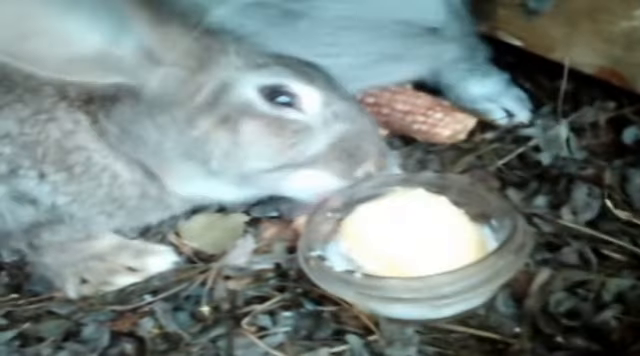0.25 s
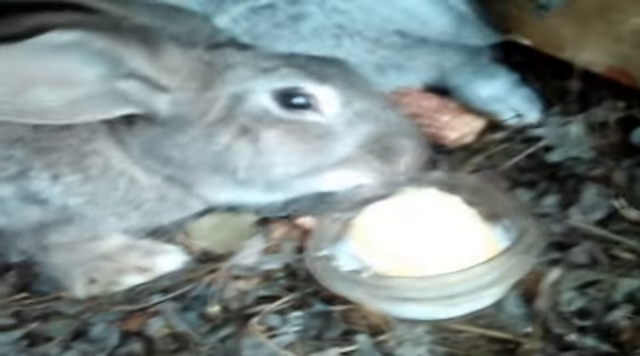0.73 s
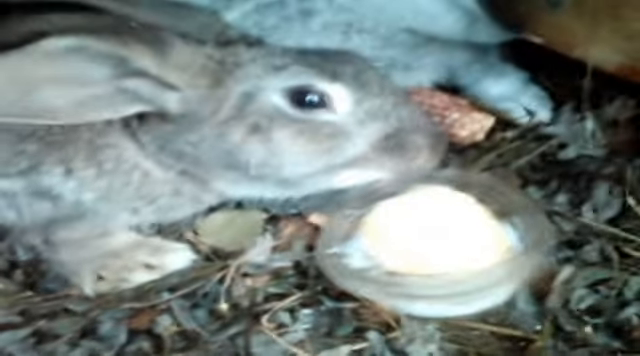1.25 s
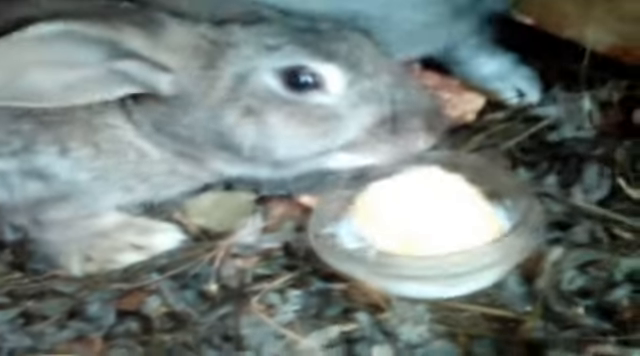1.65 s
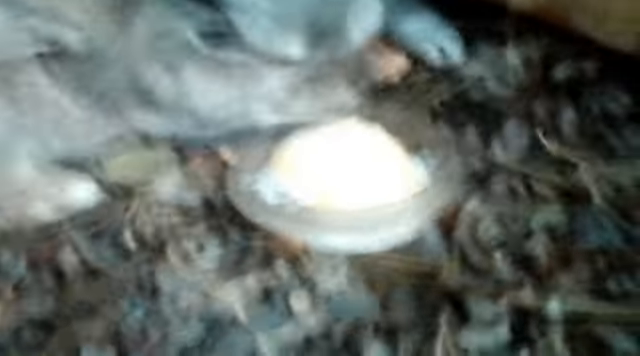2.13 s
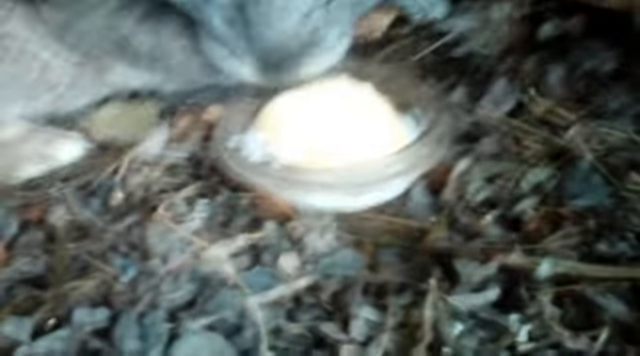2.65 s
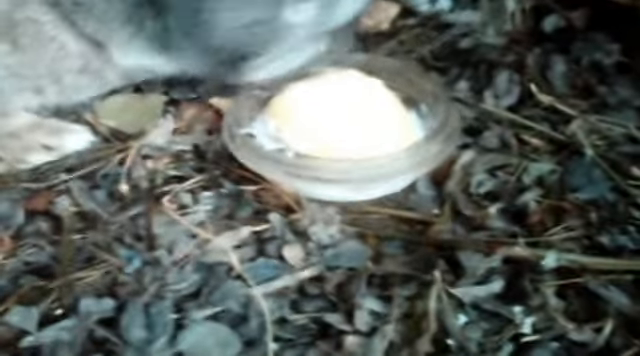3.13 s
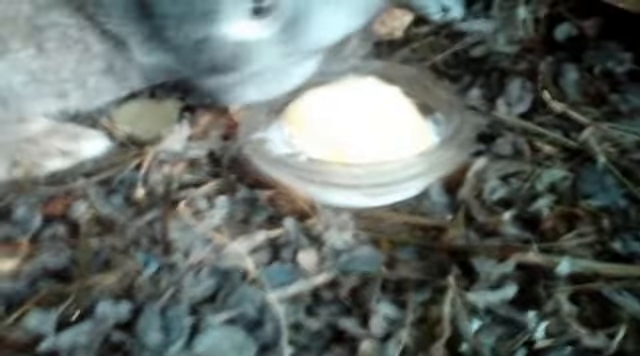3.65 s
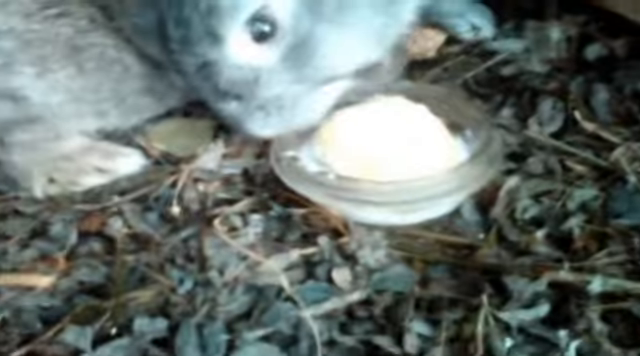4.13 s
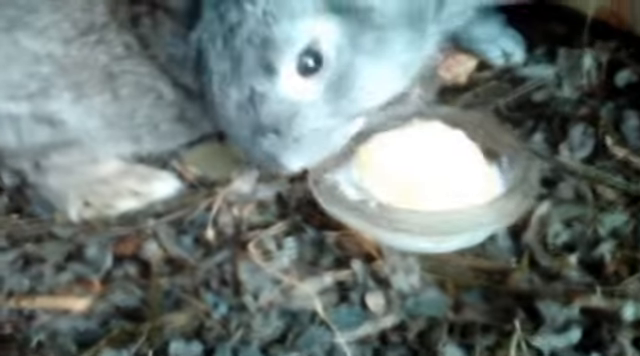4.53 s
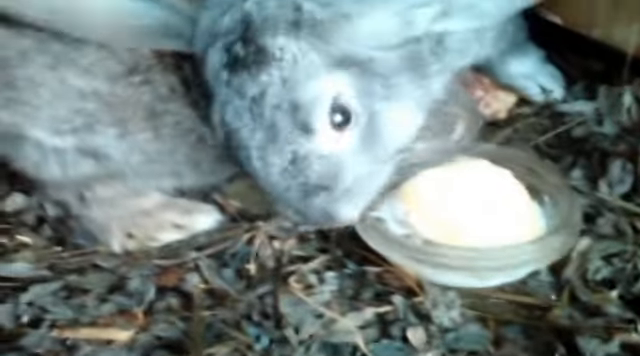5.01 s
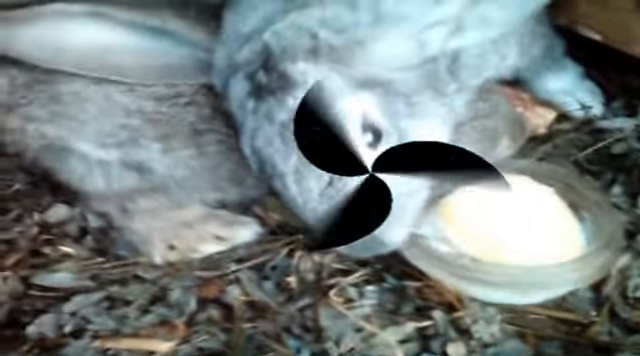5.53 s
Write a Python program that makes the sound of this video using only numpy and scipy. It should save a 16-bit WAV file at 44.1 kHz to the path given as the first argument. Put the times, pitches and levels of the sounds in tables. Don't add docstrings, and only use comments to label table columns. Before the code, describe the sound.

Very close to a small camera microphone outdoors on dry litter, a rabbit nibbles faintly at a hard block in a glass dish, then bites harder with sharp cracks. A second rabbit takes over with denser crunching, loudest just after three seconds with a dull dish knock. Later only sparse nibbles, ticks and soft paw thuds remain over low hiss.

```python
import sys
import numpy as np
from scipy import signal
from scipy.fft import rfft, irfft, next_fast_len
from scipy.io import wavfile
from scipy.ndimage import uniform_filter1d, map_coordinates

SR = 44100
rng = np.random.default_rng(int(sys.argv[2]) if len(sys.argv) > 2 else 0)


def gain_from_db(level_db):
    decades = np.asarray(level_db, float) / 20
    return 10 ** decades


def file_out(sig):
    cols = np.atleast_2d(sig).T
    lim = np.clip(cols, -1, 1)
    pcm = np.round(lim * 32767).astype(np.int16)
    wavfile.write(sys.argv[1], SR, pcm)


N = 254456
CLOCK = np.arange(N) / SR


def unit(x):
    return x / np.sqrt(np.mean(x ** 2) + 1e-20)


def curves(rows):
    s, *columns = np.transpose(rows)
    return [np.interp(CLOCK, s, column) for column in columns]


def wobble(rate_hz):
    knots = rng.standard_normal(int(N * rate_hz / SR) + 4)
    return map_coordinates(knots, [CLOCK * rate_hz])


def filtered(x, response):
    m = next_fast_len(N + 8192)
    return irfft(rfft(x, m) * response(np.fft.rfftfreq(m, 1 / SR)), m)[:N]


# centre_hz [Hz], width_hz [Hz], level_db [dB]
JAW_MODES = [(920, 130, -1), (1200, 240, -5), (1480, 220, -6), (1690, 150, 1), (2050, 200, -5)]
DISH_MODES = [(2563, 690, 2), (2900, 620, 0.5), (3820, 530, -1), (4400, 3400, -2)]
BLOCK_MODES = [(5690, 1640, 1.2), (6730, 1100, 0.52), (7440, 1200, 1.3), (8360, 1900, -0.42)]
EDGE_MODES = [(9500, 1000, -3.5), (11010, 1000, 0), (12050, 1100, -0.5), (14700, 1600, -5.5)]
SOIL_MODES = [(130, 270, -10.5), (267, 280, 6.5), (610, 330, 1.5)]
# centre_hz [Hz], width_hz [Hz], level_db [dB at firmness 1]
HOUSING_DIPS = [(2300, 100, -1.5), (4750, 200, -1.2), (10100, 300, -0.7), (13300, 500, -2.5), (15700, 300, -3)]
# start_s [s], lean_db [dB, dish over jaw], dish_hz [Hz], block_hz [Hz], firmness [1]
POSE = [(.1, 0.5, 3030, 6600, 1.9), (.24, 11, 4100, 7400, 1.3), (.3, 20, 2980, 6200, 0.74),
        (.53, 9, 2960, 7200, 0.63), (.8, 0, 3840, 7050, 0.34), (1.3, -4.5, 3650, 6460, 0.75),
        (1.5, 2, 3400, 7000, 1.36), (1.7, 4, 3300, 7100, 0.96), (1.83, 9, 3900, 7000, 0.48),
        (1.95, 3, 3600, 6100, 0.96), (2.24, 0, 3650, 6570, 0.75), (2.4, -0.5, 3250, 6640, 1.3),
        (2.8, -1.5, 4020, 7000, 1.27), (2.95, -6, 3500, 7000, 1.17), (3.1, 1.5, 3200, 6970, 1.7),
        (3.55, -2.5, 4100, 7060, 1.16), (4.2, -6.5, 3670, 7000, 1.1), (5.7, -2.5, 3700, 8500, 0.78)]
# start_s [s, centre], half_length_s [s], level_db [dB added to the soil]
SHOVES = [(.04, .03, 16), (0.373, 0.11, 22.5), (0.816, 0.066, 23), (1.302, .04, 14.5), (1.65, 0.035, 14),
          (2.355, 0.15, 24), (2.538, .04, 13.5), (3.013, .02, 19), (3.132, .025, 19.5), (3.303, 0.077, 5.5),
          (3.704, 0.03, 7), (4.1, .1, 14), (4.86, .05, 25)]
# jaw_hz [Hz], jaw_width [log ratio], jaw_lead_db [dB], edge_hz [Hz],
# edge_lead_db [dB], dip_depth [1], edge_share_db [dB]
SKULLS = [
    (1360, 0.17, 1, 11600, 1.6, 0.8, -1),
    (1700, .07, 3, 10200, 5.4, 0.85, 0.53),
]
SWAP_S = 2.62


def gnawing():
    hz, t, z = signal.stft(grit(spread_db=2.1, clump_db=0.9), SR, nperseg=512, noverlap=384)
    hz = hz[:, None] + 1
    at = np.minimum(np.round(t * SR).astype(int), N - 1)
    force, depth_db = pressure()
    depth_db = depth_db[at]
    skull = np.array(SKULLS)[(t > SWAP_S).astype(int)].T
    jaw_hz, jaw_width, jaw_lead_db, edge_hz, edge_lead_db, dip_depth, edge_share_db = skull
    lean_db, dish_hz, block_hz, firmness = [curve[at] for curve in curves(POSE)]

    jaw_db = depth_db - lean_db / 2
    dish_db = depth_db + lean_db / 2
    edge_db = -7.5 + 6 * (block_hz / 1000 - 7) - 0.19 * depth_db + edge_share_db
    edge_hz = edge_hz + 4600 * (firmness - 1.3)
    soil_db = -23.5 + sum(db * np.exp(-((t - s) / half) ** 2) for s, half, db in SHOVES)

    rasp = gain_from_db(2 * jaw_db) * body(JAW_MODES, hz, firmness, jaw_hz, jaw_width, jaw_lead_db)
    rasp += gain_from_db(2 * dish_db) * body(DISH_MODES, hz, firmness, dish_hz, width=0.18, lead_db=6.5)
    rasp += body(BLOCK_MODES, hz, firmness, block_hz, width=0.19, lead_db=4.5)
    rasp += gain_from_db(2 * edge_db) * body(EDGE_MODES, hz, firmness, edge_hz, width=0.099, lead_db=edge_lead_db)
    housing_db = sum(db * np.exp(-((hz - centre) / w) ** 2 / 2) for centre, w, db in HOUSING_DIPS)
    rasp *= gain_from_db(2 * firmness * dip_depth * housing_db)
    scrape = gain_from_db(2 * soil_db) * body(SOIL_MODES, hz, 1.01, lead_hz=300, width=0.56, lead_db=-8.5)

    patches = uniform_filter1d(rng.standard_normal(z.shape), size=9, axis=0)
    patches = uniform_filter1d(patches, size=7, axis=1)
    gain = np.sqrt((rasp + scrape) / np.sum(rasp, axis=0) * len(hz))
    gain = gain * gain_from_db(1.54 * unit(patches))
    grains = signal.istft(z * gain, SR, nperseg=512, noverlap=384)[1][:N]
    chatter_db = 0.7 * wobble(70)
    return force * gain_from_db(-0.73 + chatter_db) * grains


def grit(spread_db, clump_db):
    size_db = spread_db * np.minimum(rng.exponential(size=N), 4)
    size_db = size_db + clump_db * wobble(260)
    return unit(rng.standard_normal(N) * gain_from_db(size_db))


def body(modes, hz, firmness, lead_hz, width, lead_db):
    peaks = 0
    for centre, w, db in modes:
        peaks = peaks + gain_from_db(2 * db) * (hz * w) ** 2 / ((centre ** 2 - hz ** 2) ** 2 + (hz * w) ** 2)
    nearness = np.exp(-(np.log(hz / lead_hz) / width) ** 2 / 2)
    power = peaks ** np.clip(firmness, 0.5, 3) * gain_from_db(2 * lead_db * nearness)
    return power / np.sum(power, axis=0)


# [dB, jaw and dish against block]
NIBBLES = [(.038, .008, .005, -64, 1), (.076, .006, .012, -60.5, -8), (.116, .008, .006, -54, -8),
           (.234, 0.02, .005, -52, -14), (.285, .013, 0.025, -58.5, -4), (.326, .013, .006, -57, -13),
           (.36, .05, 0.064, -67.5, -11), (.425, .006, .011, -58, -20), (.505, .008, 0.011, -59, -5.5),
           (.551, .013, .015, -61.5, -5), (.894, .016, .012, -61.5, -6), (2.013, .005, .05, -61, 1),
           (2.08, .012, 0.034, -59, 4), (3.8, .015, .012, -59, 10), (3.838, 0.044, 0.018, -55, 1),
           (3.963, 0.014, 0.011, -53, -3.5), (4.014, .01, .006, -53, -2.5), (4.033, .011, 0.022, -61.5, 4),
           (4.113, 0.024, 0.03, -56.5, -2.5), (4.855, .007, 0.034, -67, 8), (5.356, .005, .001, -56.5, -9),
           (5.699, .005, 0.021, -51.5, -3), (5.726, 0.028, 0.017, -52.5, -5.5)]
BITES = [(1.281, 0.0012, 0.021, -45, -5), (1.356, .014, 0.022, -48.5, -5), (1.481, 0.0044, 0.038, -38, -4),
         (1.519, .004, 0.046, -50, 0.5), (1.596, 0.013, 0.023, -43, -0.5), (1.738, .014, 0.045, -47.5, -3),
         (1.8, 0.052, 0.048, -41.5, -9), (1.84, 0.04, 0.03, -44, -5), (1.923, 0.041, 0.033, -35, -3.5),
         (2.294, .002, 0.014, -43, 5), (2.448, 0.064, .033, -45, 7.5), (2.649, 0.046, 0.04, -49.5, -11),
         (2.697, 0.046, 0.041, -46.5, -8), (2.797, 0.011, .03, -48, -9.5), (2.839, .051, 0.016, -42, -10.5),
         (3.011, 0.036, 0.022, -39, -10), (3.045, 0.027, .012, -32.5, -0.5),
         (3.078, 0.0092, 0.025, -22, -3), (3.14, .03, 0.055, -45.5, -1), (3.277, 0.039, .09, -42.5, -4.5),
         (3.573, .028, 0.018, -45.5, -7.5), (3.64, 0.02, 0.017, -44.5, -2), (3.69, 0.052, .03, -34.5, -5.5)]
DRAGS = [(.745, 0.094, 0.056, -54.5, -5), (.917, .009, 0.0044, -49.5, -10),
         (1.647, 0.027, 0.033, -48.5, -3.5), (1.704, 0.025, 0.022, -41, -5.5),
         (1.983, 0.017, 0.017, -51, -5), (2.228, .03, 0.053, -39, -3), (2.336, 0.11, 0.072, -44, 3.5),
         (2.548, .075, 0.016, -38, -3), (2.6, .01, .03, -62, 2), (2.875, .022, 0.022, -39.5, -6.5),
         (2.98, 0.29, .014, -46, -6), (3.111, .018, .012, -31, 0.5), (3.255, .012, 0.011, -50.5, 10),
         (3.496, 0.027, 0.047, -45, -7.5), (3.739, .02, 0.036, -56, -8), (4.401, 0.049, 0.013, -62, -2)]


def pressure():
    power, deep = np.full(N, 1e-12), np.zeros(N)
    # strokes, sag while held [dB per s], lift-off [s]
    for rows, sag, lift_s in ((NIBBLES, -49, 0.024), (BITES, -52, 0.021), (DRAGS, -55, 0.043)):
        for s, rise_s, hold_s, db, depth_db in rows:
            times = np.cumsum([s - rise_s, rise_s, hold_s, lift_s])
            levels_db = db + np.array([-25.5, 0, sag * hold_s, sag * hold_s - 26.5])
            span = slice(round(times[0] * SR), round(times[3] * SR))
            stroke = gain_from_db(2 * np.interp(CLOCK[span], times, levels_db))
            power[span] += stroke
            deep[span] += stroke * depth_db
    return np.sqrt(power), deep / power


# start_s [s], level_db [dB peak], pitch_hz [Hz], ring_db [dB]
SNAPS = [(0.2386, -31, 8700, -24), (0.303, -37, 4200, -28), (0.3523, -41, 6130, -22),
         (0.518, -45, 2710, -14), (1.2823, -14, 4130, -18), (1.2852, -27, 3400, -25),
         (1.2962, -37, 2700, -3), (1.2975, -30, 5250, -23), (1.3013, -30, 7040, -24),
         (1.3506, -43, 3200, -16), (1.3937, -41, 8100, -14), (1.478, -31.5, 3560, -20),
         (1.4924, -15.5, 4420, -10), (2.1518, -37.5, 6700, -16), (2.155, -40, 8000, -20),
         (2.5934, -39, 1480, -3), (2.6433, -29, 7400, -21), (3.0095, -32, 3980, 7), (3.0107, -28, 3000, -2),
         (4.1587, -50, 5300, -16), (4.3545, -42, 5900, -16), (4.4451, -52, 3700, -12),
         (4.752, -40.5, 8000, -20), (4.8463, -39, 2200, 0), (4.853, -37.5, 4400, -13),
         (5.3543, -41, 1230, -16), (5.3582, -43, 1900, -20), (5.6353, -54, 1300, -10),
         (5.6989, -43, 1810, -12)]
# pitch_hz [Hz], level_db [dB], t60_s [s]
GLASS_MODES = [(900, -2, .045), (1700, 0, .045), (3550, -3, .02), (7200, -6, .01)]


def snaps():
    out, t = np.zeros(N + 3000), np.arange(2600) / SR
    scatter_db = 3 * rng.standard_normal((len(SNAPS), len(GLASS_MODES)))
    for (s, db, hz, ring_db), chip_db in zip(SNAPS, scatter_db):
        turn = hz * t - 1
        crack = -1.16 * np.sin(2 * np.pi * turn) * np.exp(-(turn / 0.38) ** 2)
        ring = np.zeros(len(t))
        for (mode_hz, mode_db, t60_s), extra_db in zip(GLASS_MODES, chip_db):
            level_db = mode_db + extra_db - 1.07 * np.log(mode_hz / hz) ** 2
            ring += gain_from_db(level_db - 60 * t / t60_s) * np.sin(2 * np.pi * mode_hz * t)
        ring *= gain_from_db(ring_db - 15.5) * (1 - np.exp(-t / 0.00023))
        out[round((s - 1 / hz) * SR):][:len(t)] += gain_from_db(db) * (crack + ring)
    return out[:N]


# start_s [s], level_db [dB peak], pitch_hz [Hz]
KNOCKS = [
    (1.279, -71, 654),
    (1.491, -55, 684),
    (2.547, -52, 207),
    (3.008, -40, 300),
    (3.075, -36.5, 394),
    (4.845, -43, 420),
    (5.351, -50.5, 217),
    (5.635, -58, 157),
    (5.697, -50.5, 597),
]


def knocks():
    out, t = np.zeros(N + 3000), np.arange(2600) / SR
    for s, db, hz in KNOCKS:
        swing = np.sin(2 * np.pi * hz * t + 0.5) * np.exp(-1.3 * hz * t)
        swing *= 1 - np.exp(-t / 0.0002)
        out[round((s + 0.001) * SR):][:len(t)] += 1.67 * gain_from_db(db) * swing
    return out[:N]


# start_s [s], level_db [dB peak], pitch_hz [Hz]
PAWS = [
    (0.249, -59, 56.5),
    (0.285, -53, 86.1),
    (0.416, -52, 72.7),
    (0.919, -64, 137),
    (1.467, -69, 64.6),
    (2.547, -61, 105),
    (4.849, -59, 59.2),
    (4.909, -53.5, 56),
    (5.109, -61, 67.3),
]


def paws():
    out = np.zeros(N)
    for s, db, hz in PAWS:
        t = CLOCK - s - 0.012
        out += gain_from_db(db) * np.cos(2 * np.pi * hz * t) * np.exp(-(t / 0.0077) ** 2)
    return out


# pitch_hz [Hz], level_db [dB per Hz]
AIR = [(25, -30), (36, -3), (50, -2), (100, -4.5), (200, -5), (400, -9), (800, -11.5), (2000, -16),
       (3400, -17.5), (8000, -20), (15500, -23)]


def air():
    hz, db = np.transpose(AIR)
    noise = rng.standard_normal(N)
    hiss = unit(filtered(noise, lambda f: gain_from_db(np.interp(np.log(f + 1), np.log(hz), db))))
    sway_db = 0.45 * wobble(9)
    return gain_from_db(-63 + sway_db) * hiss


# pitch_hz [Hz], level_db [dB rms]
WHINE = [(6449, -92), (12898, -88)]


def whine():
    out = np.zeros(N)
    for hz, db in WHINE:
        out += np.sqrt(2) * gain_from_db(db) * np.sin(2 * np.pi * hz * CLOCK + 0.58 * wobble(3.9))
    return out


# start_s [s], level_db [dB]
FADE = [(0, 0.5), (4.95, 0), (5.77, -2.5)]


def scene():
    fade_db = curves(FADE)[0]
    surroundings = paws() + air() + whine()
    return (gnawing() + snaps() + knocks() + gain_from_db(fade_db) * surroundings)[None]


def roll_off(x):
    return signal.sosfilt(signal.butter(12, 16150, fs=SR, output="sos"), x)


def record(dry):
    mix = filtered(dry[0], lambda hz: (hz < 15500) * hz ** 4 / (hz ** 4 + 36 ** 4))[None]
    return roll_off(mix)


dry = scene()
out = record(dry)
file_out(out)
```